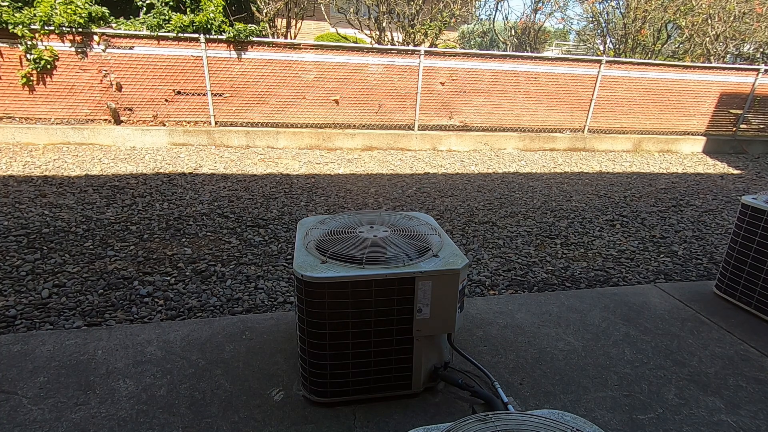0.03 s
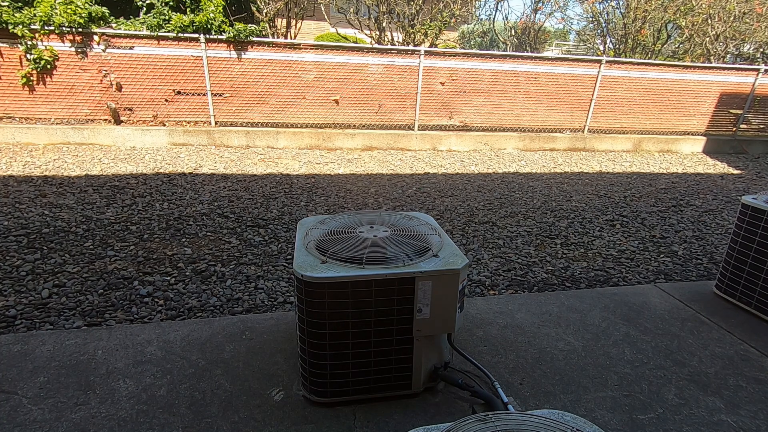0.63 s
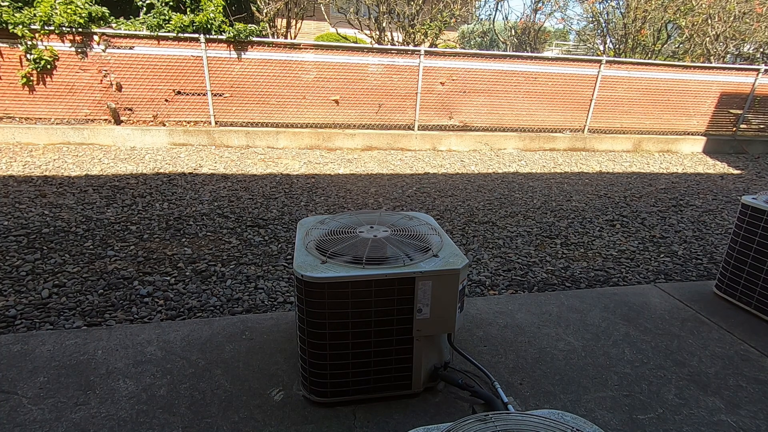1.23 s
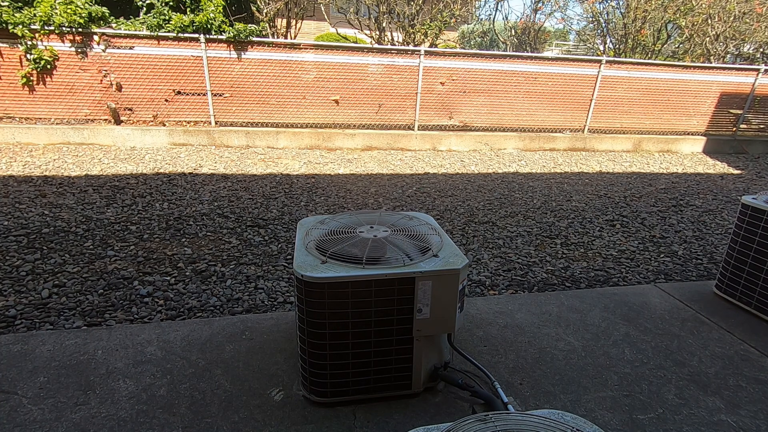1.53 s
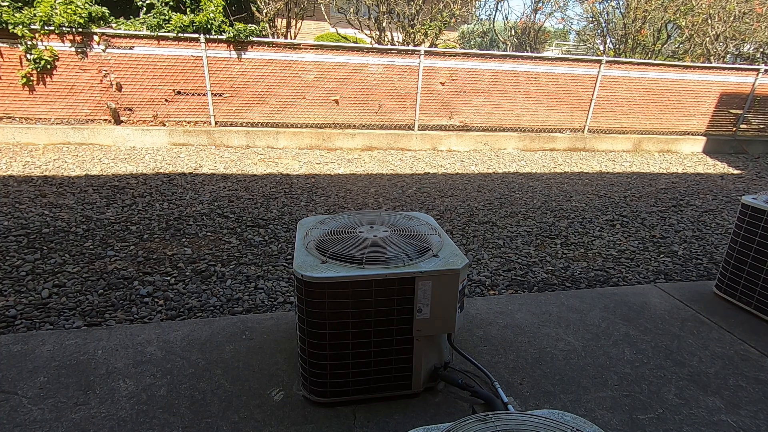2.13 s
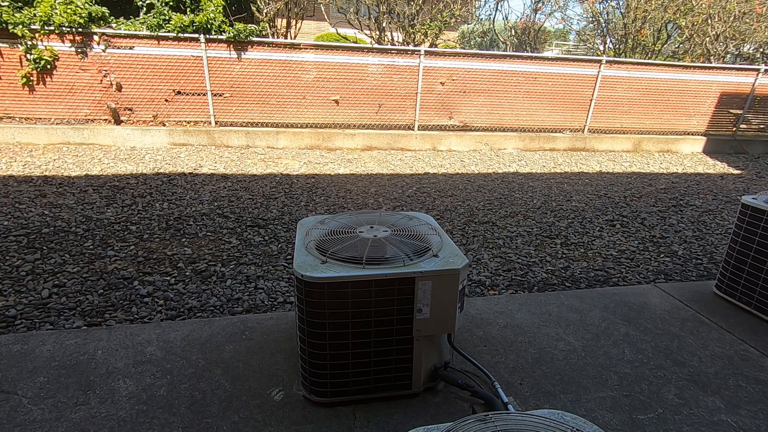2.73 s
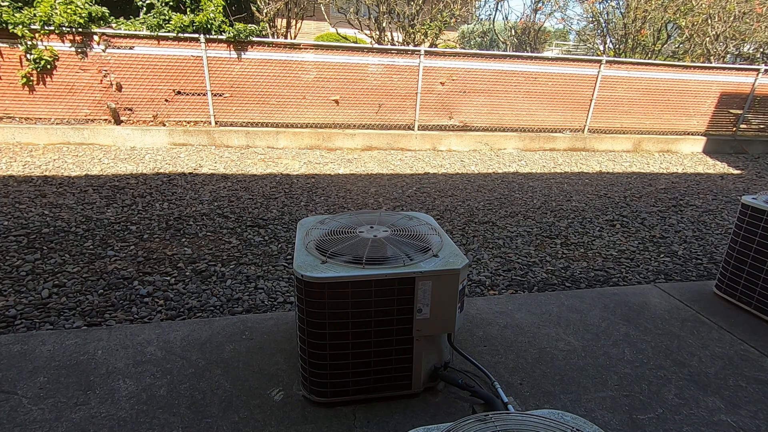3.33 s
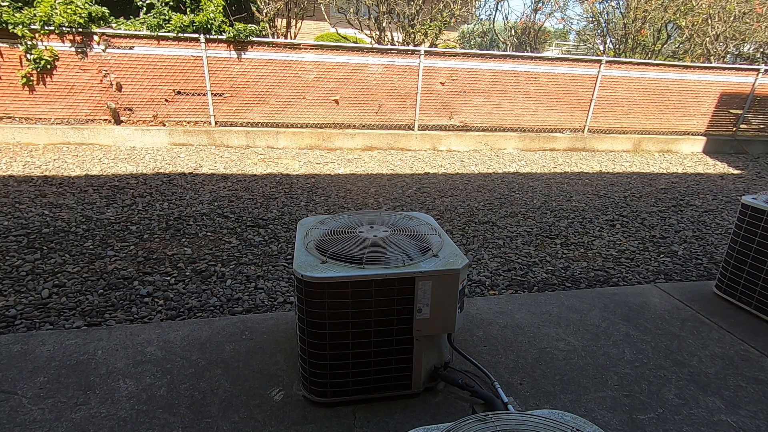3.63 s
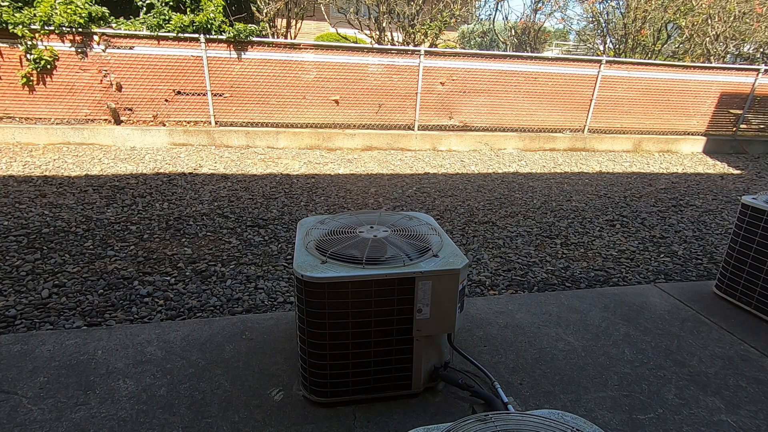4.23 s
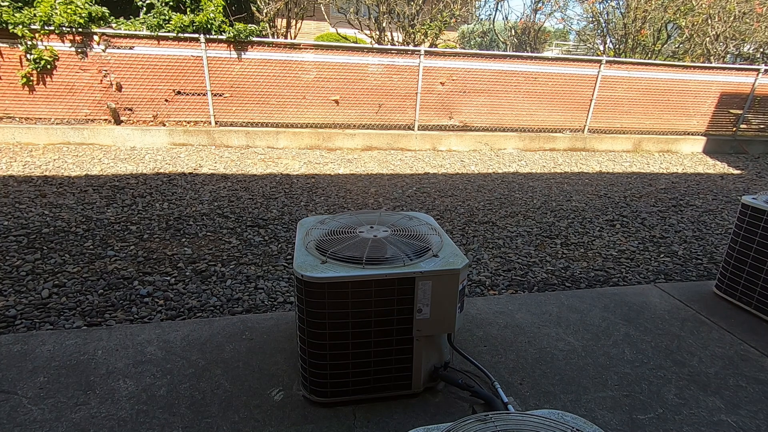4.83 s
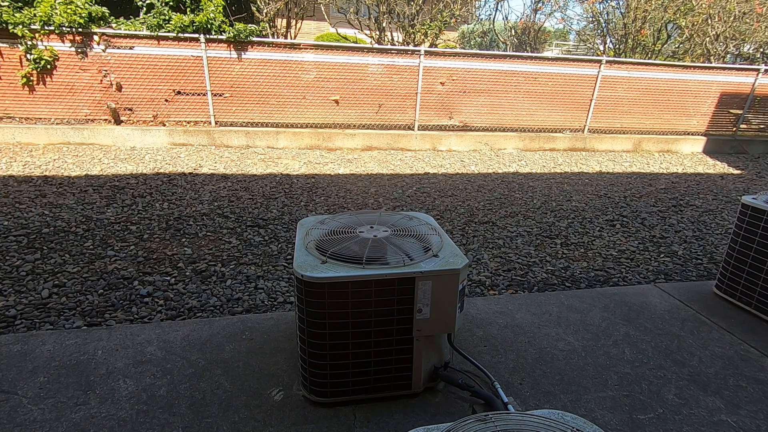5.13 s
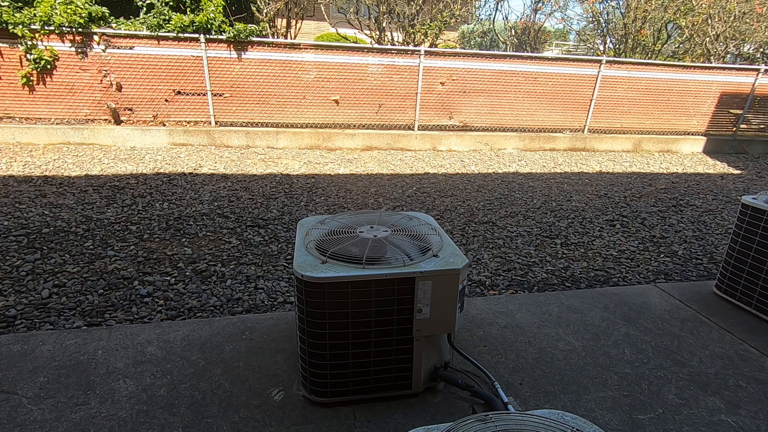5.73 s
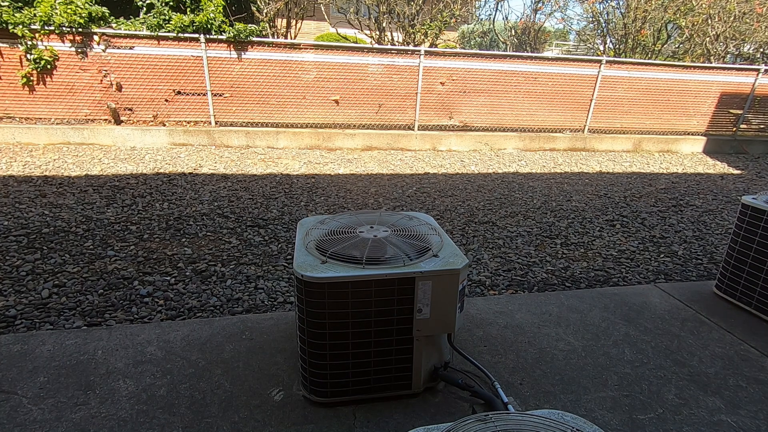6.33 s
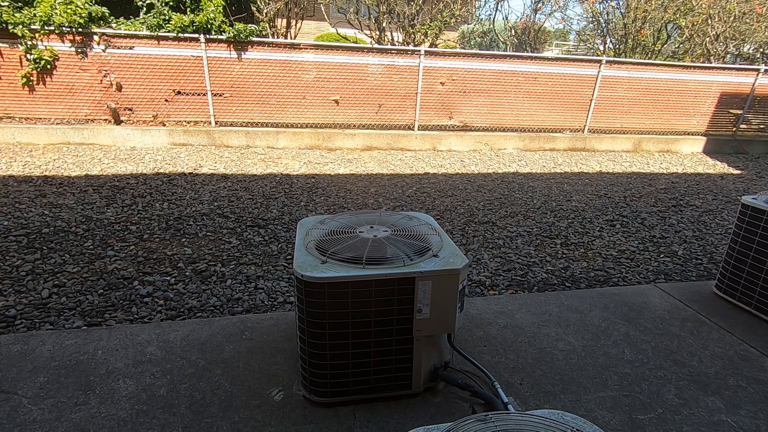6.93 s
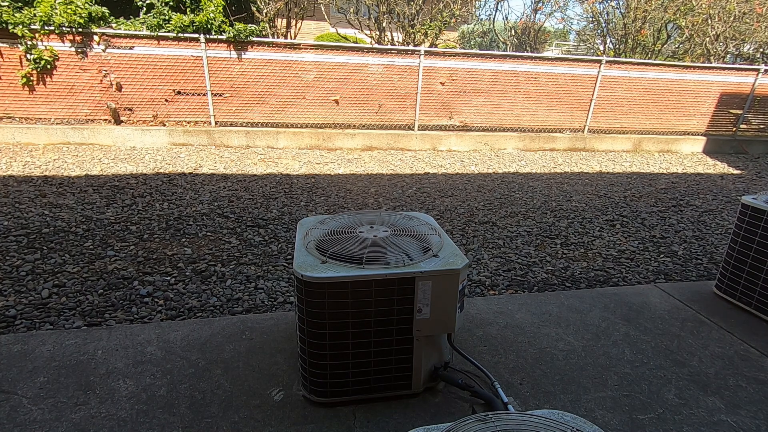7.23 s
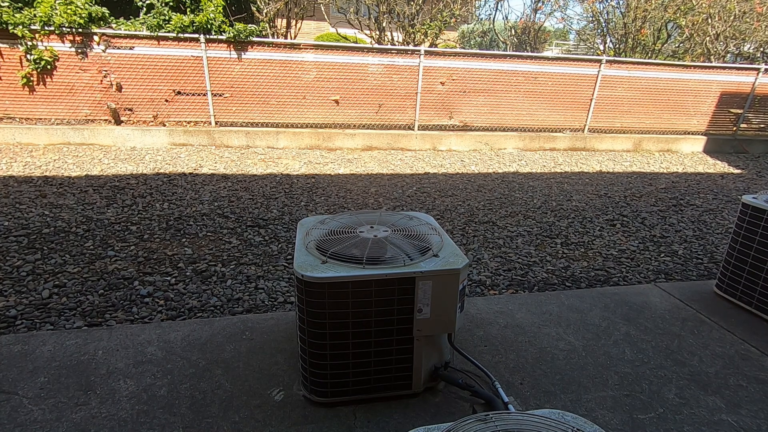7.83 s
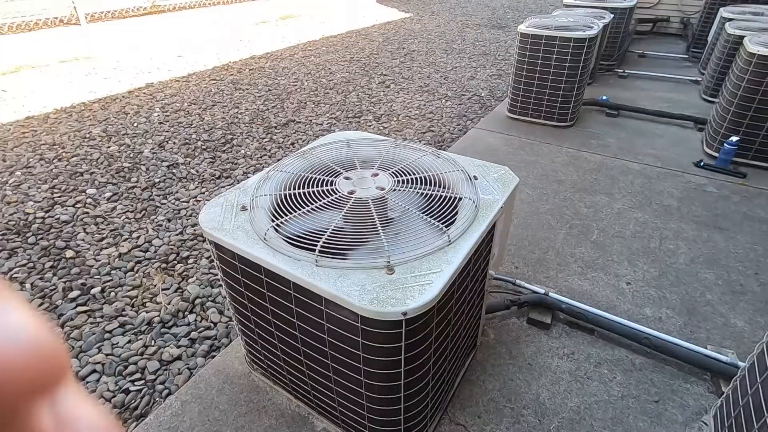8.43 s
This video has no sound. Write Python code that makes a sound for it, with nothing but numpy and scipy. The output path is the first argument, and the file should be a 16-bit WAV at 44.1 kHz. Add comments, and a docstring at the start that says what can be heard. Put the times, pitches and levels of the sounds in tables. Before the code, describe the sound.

An outdoor air conditioner runs with a steady rush of air and low hum, a distant engine droning, then two small knocks.

```python
"""A steady rush of air and a low hum: an outdoor air conditioner runs by a wall, with more units nearby.
Its fan pushes air through the grille, its motor hums at twice the mains frequency, and its compressor
buzzes just under mains speed. A low drone, likely a distant engine, comes in swells, climbs past the hum
and beats with it; another sinks. Near the end come two small knocks, then the sound cuts off and starts
to fade back in."""
import sys
import numpy as np
from scipy import signal
from scipy.fft import rfft, irfft, next_fast_len
from scipy.io import wavfile
from scipy.ndimage import uniform_filter1d

SR = 44100
rng = np.random.default_rng(int(sys.argv[2]) if len(sys.argv) > 2 else 0)


def inscribe(sig):
    """Save sig as 16-bit PCM at rate SR to the path in sys.argv[1].

    A 1-D sig is mono; a 2-D sig holds one channel per row.
    Samples are clipped to [-1, 1] before scaling.
    """
    pcm = np.round(np.clip(np.atleast_2d(sig).T, -1, 1) * 32767)
    wavfile.write(sys.argv[1], SR, pcm.astype(np.int16))


N = 383229
TIME = np.arange(N) / SR


# how the air flow rises and falls: (t/s, relative level/dB)
FLOW_CURVE = [(0.0, 1.6), (1.1, 1), (2.1, 1.5), (2.5, 0.3), (3.0, 0.5), (3.6, -1.2), (4.2, -0.7),
              (4.8, 0.9), (5.2, -1.9), (5.8, 0.6), (6.5, -0.6), (8.1, 0.4)]
def fan_air():
    """Roar and hiss follow one air flow and flicker as the blades cut through swirls of air."""
    flow_db, swirls = follow(FLOW_CURVE), wander(rate_hz=54)
    # the low roar swells for two seconds, probably distant traffic
    passing_rumble_db = 2 * swell(start_s=.44, length_s=2.07, edge_s=.8)
    roar_db = -24 + .82 * flow_db + .66 * swirls + passing_rumble_db
    hiss_db = -35.5 + .94 * flow_db + .35 * swirls
    return blade_roar() * gain_of(roar_db) + grille_hiss() * gain_of(hiss_db)


# how strong the roar is from low to high: (f/Hz, relative level/dB)
ROAR_SHAPE = [(18, -18), (36, -15), (54, -2.5), (74, -10), (110, 1.5), (185, -8.5), (222, -2.5), (265, -9),
              (385, -12), (435, -14), (560, -15.5), (675, -14.5), (880, -17.5), (1060, -30)]
def blade_roar():
    """The blades churn the air into a roar; late on, a short echo grows and makes it hollow."""
    def shape_db(hz):
        octaves_past_table = np.log2(np.maximum(hz / ROAR_SHAPE[-1][0], 1))
        return level_at(ROAR_SHAPE, hz) - 24 * octaves_past_table

    roar = air_noise(shape_db, patchy_db=1.3, window=2048)
    echo_start_s, echo_grow_s, echo_delay_s = 6, 1.4, .00278
    echo_gain = gain_of(-12) * np.clip((TIME - echo_start_s) / echo_grow_s, 0, 1)
    return roar + echo_gain * np.interp(TIME - echo_delay_s, TIME, roar)


# how strong the hiss is from low to high: (f/Hz, relative level/dB)
HISS_SHAPE = [(400, -21.5), (1000, -2.5), (1500, -1), (2200, -1.5), (2650, -7.5), (3400, -10),
              (4600, -13.5), (5600, -19.5), (7250, -23), (8350, -21), (8800, -30.5), (10400, -27.5),
              (12300, -30), (15600, -35)]
# pitches at which the cabinet and grille ring: (f/Hz, width/Hz, boost/dB)
CABINET_RINGS = [(1826, 40, 3.5), (1910, 63, 3.5), (2160, 140, 3), (3020, 110, 2.5), (3330, 87, 2.5),
                 (3445, 100, 3.5), (4610, 60, 4), (6350, 250, 4.5), (7930, 110, 0.5), (8050, 390, 2.5)]
def grille_shape_db(hz):
    """The level of the hiss at each frequency, boosted where the cabinet rings."""
    boost_db = sum(db / (1 + (2 * (hz - ring_hz) / width) ** 2) for ring_hz, width, db in CABINET_RINGS)
    return level_at(HISS_SHAPE, hz) + boost_db


def grille_hiss():
    """Air hisses through the coil and grille, and bounces off the surfaces around it."""
    return wall_echoes(air_noise(grille_shape_db, patchy_db=.5, window=512), echo_db=-14)


# the tones of the motor's hum: (multiple of the hum's pitch, level/dB)
HUM_TONES = [(1, -25), (2, -40), (3, -43), (4, -39), (5, -51.5), (6, -50), (7, -51), (8, -51), (9, -53.5),
             (10, -52.5), (13, -61), (15, -55.5), (40, -78)]
def motor_hum(hz=119.93):
    """Magnetic pull shakes the motor: one steady low tone under slightly fluttering higher ones."""
    (_, base_db), *overtones = HUM_TONES
    base = np.sqrt(2) * gain_of(base_db) * np.cos(2 * np.pi * hz * TIME)
    return base + machine_tones(overtones, hz, drift=.0001, flutter=.22, rate_hz=3.6)


# the tones the compressor's casing gives off: (multiple of the shaft speed, level/dB)
COMPRESSOR_TONES = [(1, -37.5), (3, -40.8), (4, -39.7), (5, -40.5), (7, -45.2), (9, -45.3), (15, -50.7),
                    (18, -56.8), (22, -59.2), (23, -50.7), (24, -56.7), (26, -58.9), (27, -56.4),
                    (28, -58.2), (29, -53.7), (32, -54.2), (39, -60.0), (67, -70.1), (83, -74.7),
                    (84, -75.7)]
def compressor():
    """The spinning shaft shakes the casing, which buzzes."""
    return machine_tones(COMPRESSOR_TONES, hz=57.69, drift=.00023, flutter=.25, rate_hz=3.2)


# the tones of the fan next door: (multiple of its base pitch, level/dB)
NEIGHBOUR_TONES = [(2, -38.5), (3, -38.5), (4, -36.5), (5, -47), (6, -43.5)]
# one low tone for each fan along the slab: (f/Hz, level/dB)
BLADE_TONES = [(46.4, -41), (49.1, -40.5), (54.5, -32.5), (55.1, -40)]
def fan_tones():
    """Each passing blade gives the air a push; the pushes blend into low tones."""
    neighbour = machine_tones(NEIGHBOUR_TONES, hz=51.35, drift=.00086, flutter=.43, rate_hz=6)
    return neighbour + sum(tone(hz * TIME, db, flutter=.6, rate_hz=1.6) for hz, db in BLADE_TONES)


# thin, high tones of panels and motors: (f/Hz, level/dB)
WHINE_TONES = [(716, -48), (1037, -62), (1442.5, -54.5), (1452.8, -59.5), (1915.1, -60.5), (1922.5, -54.5),
               (1963.6, -53), (2033.5, -54.5), (2085.4, -61), (3079, -63.5), (3138, -70), (3359, -68),
               (3869, -73), (4793, -67), (5070.4, -75.5)]
def panel_whines():
    """Vibrating panels and motors whine, each wavering on its own."""
    return sum(tone(hz * TIME, db, flutter=.42, rate_hz=2) for hz, db in WHINE_TONES)


def casing_buzz(shaft_hz=57.69, db=-51.5, spread_db=8):
    """The compressor's many high overtones sound metallic; the casing lets some out more than others."""
    length = next_fast_len(N, True)
    hz = shaft_hz * np.arange(42, 220)
    levels_db = grille_shape_db(hz) + spread_db * np.tanh(rng.standard_normal(len(hz)))
    phases = np.exp(2j * np.pi * rng.random(len(hz)))
    spectrum = np.zeros(length // 2 + 1, complex)
    spectrum[np.round(hz * length / SR).astype(int)] = gain_of(levels_db) * phases
    return gain_of(db + wander(rate_hz=2.1)) * normalised(irfft(spectrum, length)[:N])


# two knocks, each a quick pair of hits: (t/s, level/dB, thump compared with tick/dB)
KNOCK_HITS = [(8.2045, -18.5, -25), (8.2085, -20, -6), (8.3425, -14.5, -5), (8.3441, -16.5, 8.5)]
# the tones that ring in each tick: (f/Hz, relative level/dB, decay time/s)
TICK_TONES = [(450, 0, .0018), (900, 0, .0014), (1400, -1, .0013), (2200, -3, .001), (2900, -4.5, .001),
              (3550, -5.5, .0011)]
def knocks(thump_hz=190, thump_decay_s=.007):
    """Each hit is a dull tick of quickly dying tones plus a low thump."""
    out = np.zeros(N)
    for start_s, db, thump_db in KNOCK_HITS:
        during = (TIME > start_s) & (TIME < start_s + .05)
        t = TIME[during] - start_s
        tick = sum((-1) ** k * gain_of(ring_db) * np.sin(2 * np.pi * hz * t) * np.exp(-t / decay_s)
                   for k, (hz, ring_db, decay_s) in enumerate(TICK_TONES))
        thump = np.sin(2 * np.pi * thump_hz * t) * np.exp(-t / thump_decay_s)
        out[during] += gain_of(db) * (tick + gain_of(thump_db) * thump)
    return signal.sosfilt(signal.butter(8, 4000, fs=SR, output="sos"), out)


# a far engine's pitch, at three times its shaft speed: (t/s, f/Hz)
RISING_PITCH = [(2.1, 119.14), (2.5, 116.15), (3.2, 119.33), (3.6, 119.39), (4.1, 124.64), (4.9, 126.5),
                (5.35, 127.68), (5.7, 129.33), (8.2, 128.66)]
# when the air carries it over: (multiple of the shaft speed, start t/s, length/s, level/dB)
RISING_SWELLS = [(3, 1.93, 6.47, -29.5), (3, 2.16, 0.34, -22.5), (3, 3.17, 0.92, -21.5),
                 (2, 3.96, 2.82, -33), (3, 4.7, 0.74, -20.5), (3, 5.82, 1.72, -23), (3, 7.86, 0.28, -24.5)]
def rising_engine():
    """A far engine gathers speed; only two of its low tones carry this far."""
    shaft_turns = np.cumsum(follow(RISING_PITCH) / 3) / SR
    return sum(np.sqrt(2) * gain_of(db) * np.cos(2 * np.pi * k * shaft_turns) * swell(start_s, length_s)
               for k, start_s, length_s, db in RISING_SWELLS)


# a second far engine's pitch: (t/s, f/Hz)
SINKING_PITCH = [(1.2, 175.4), (2.15, 172.8), (2.8, 165.7)]
# when the air carries it over: (start t/s, length/s, level/dB)
SINKING_SWELLS = [(1.28, 1.1, -30), (2.73, 0.56, -24.5), (3.55, 0.76, -29)]
def sinking_engine():
    """Another engine eases off; its one low tone wavers on the way here."""
    cycles = np.cumsum(follow(SINKING_PITCH)) / SR
    strength = sum(gain_of(db) * swell(start_s, length_s) for start_s, length_s, db in SINKING_SWELLS)
    return strength * tone(cycles, db=0, flutter=.2, rate_hz=7)


def wall_echoes(sound, echo_db, count=24):
    """The slab, wall and other cabinets send back faint echoes within 40 ms."""
    echoes = np.zeros(SR // 25)
    echoes[rng.integers(SR // 500, len(echoes), count)] = rng.choice([-1., 1.], count) / np.sqrt(count)
    return normalised(sound + gain_of(echo_db) * signal.oaconvolve(sound, echoes)[:N])


def air_noise(shape_db, patchy_db, window):
    """Churning air: shaped noise whose level drifts in patches of time and pitch."""
    _, _, grid = signal.stft(rng.standard_normal(N), SR, nperseg=window)
    patches = uniform_filter1d(rng.standard_normal(grid.shape), size=8, axis=0)
    patches = normalised(uniform_filter1d(patches, size=12, axis=1))
    noise = signal.istft(grid * gain_of(patchy_db * patches), SR, nperseg=window)[1][:N]
    length = next_fast_len(N, True)
    shape = gain_of(shape_db(np.fft.rfftfreq(length, 1 / SR)))
    return normalised(irfft(rfft(noise, length) * shape, length)[:N])


def machine_tones(rows, hz, drift, flutter, rate_hz):
    """Tones tied to one shaft whose speed drifts a little."""
    cycles = np.cumsum(hz * (1 + drift * wander(rate_hz=1))) / SR
    return sum(tone(k * cycles, db, flutter, rate_hz) for k, db in rows)


def tone(cycles, db, flutter, rate_hz):
    """One tone; moving air and loose panels shake its level and timing."""
    angle = 2 * np.pi * (cycles + rng.random())
    shaken = (1 + flutter * wander(rate_hz)) * np.cos(angle) + flutter * wander(rate_hz) * np.sin(angle)
    return gain_of(db) * np.sqrt(2 / (1 + 2 * flutter ** 2)) * shaken


def wander(rate_hz, points=2048):
    """A random wobble of typical size 1, up to about the given rate."""
    hz = np.fft.rfftfreq(points, TIME[-1] / points)
    wobble = irfft(rfft(rng.standard_normal(points)) * (hz > 0) / (1 + (hz / rate_hz) ** 2))
    return np.interp(TIME, np.linspace(0, TIME[-1], points), normalised(wobble))


def swell(start_s, length_s, edge_s=.18):
    """Rises from 0 to 1, holds and falls; it is halfway up at its start and end."""
    return np.clip(.5 + np.minimum(TIME - start_s, start_s + length_s - TIME) / edge_s, 0, 1)


def follow(rows):
    """Joins (time, value) points into a value for every sample."""
    return np.interp(TIME, *np.transpose(rows))


def level_at(rows, hz):
    """Joins (frequency, level) points with straight lines on a scale of octaves."""
    row_hz, db = np.transpose(rows)
    return np.interp(np.log(hz + 1), np.log(row_hz + 1), db)


def gain_of(db):
    """Turns decibels into a number to multiply by."""
    return 10 ** (np.asarray(db) / 20)


def normalised(x):
    """Scales a signal to a typical size (rms) of 1."""
    return x / np.sqrt(np.mean(x ** 2) + 1e-20)


def scene():
    """All the sources, added into one channel."""
    units = fan_air() + motor_hum() + compressor() + fan_tones() + panel_whines() + casing_buzz()
    return (units + knocks() + rising_engine() + sinking_engine())[None]


def fader(cut_s=8.429, drop_db=14, drop_s=.003, tail_db_per_s=1400, return_s=8.632, fade_in_s=.072):
    """The volume drops fast and dies away; after a silence it starts to come back."""
    since_cut = np.maximum(TIME - cut_s, 0)
    fade_out = gain_of(-drop_db * np.minimum(since_cut / drop_s, 1) - tail_db_per_s * since_cut)
    fade_in = np.clip((TIME - return_s) / fade_in_s, 0, 1) ** 2
    return fade_out + fade_in


def record(dry):
    """The sound cuts off and returns with less bass; the highest treble is removed throughout."""
    thin_from_s, top_hz = 8.55, 15720
    thin = signal.sosfilt(signal.butter(1, 450, "high", fs=SR, output="sos"), dry)
    faded = np.where(TIME < thin_from_s, dry, thin) * fader()
    treble_cut = signal.firwin(511, top_hz, window=("kaiser", 9), fs=SR)
    return signal.oaconvolve(faded, treble_cut[None], "same")


dry = scene()
out = record(dry)
inscribe(out)
```